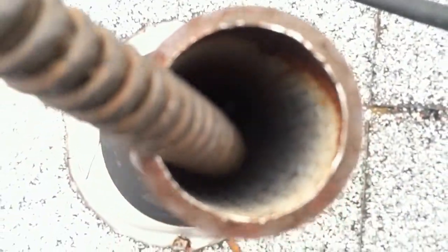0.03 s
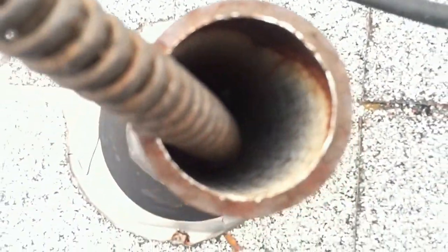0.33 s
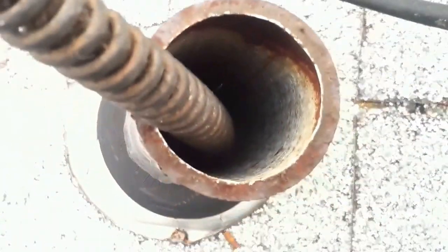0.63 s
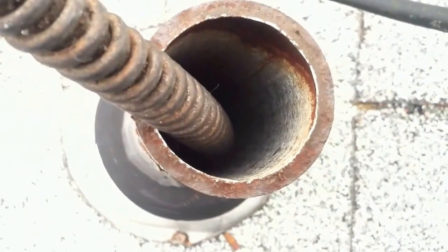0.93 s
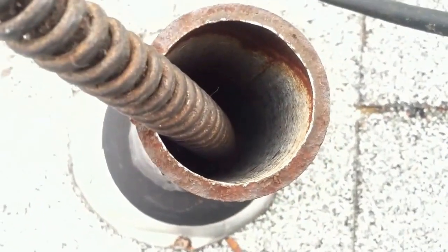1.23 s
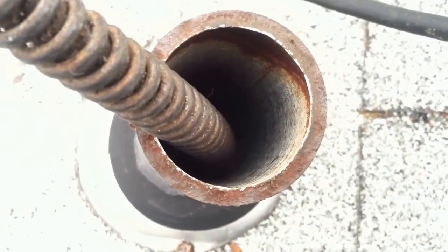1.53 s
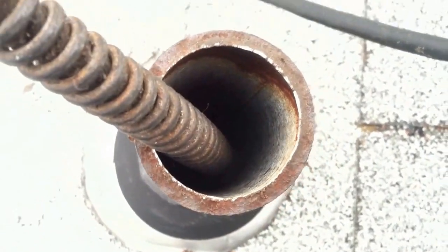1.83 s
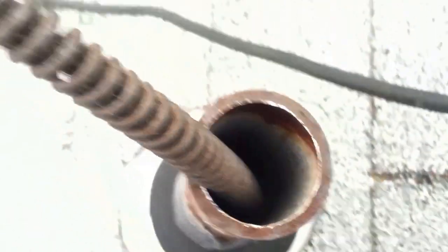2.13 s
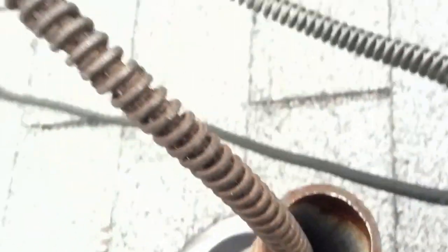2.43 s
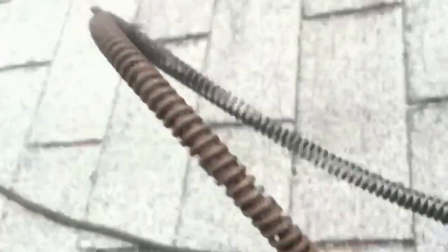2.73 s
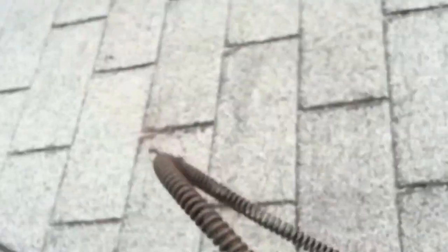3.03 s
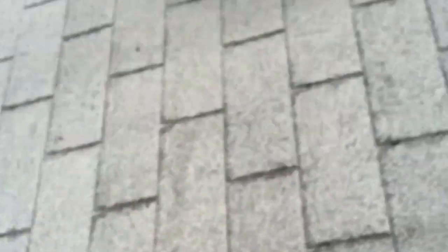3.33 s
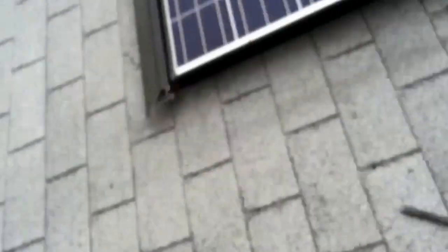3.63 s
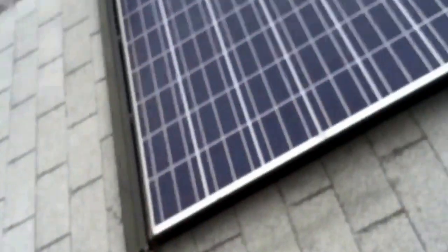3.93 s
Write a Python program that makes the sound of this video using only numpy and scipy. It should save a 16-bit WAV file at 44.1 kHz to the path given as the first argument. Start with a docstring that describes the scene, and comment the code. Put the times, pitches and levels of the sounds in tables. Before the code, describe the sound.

Water splashing and plopping inside a roof vent pipe, giving way to dull microphone bumps.

```python
"""Water rushes and splashes down a drain, heard at the mouth of a roof vent pipe with a drain cable in it.
Ringing bubbles make the gurgles and plops, and hard drops set the pipe ringing.
After two seconds the microphone draws away: the water fades, wind and handling thump on the microphone,
grit ticks and scuffs on the shingles, and a high outdoor hiss is left."""
import sys
import numpy as np
from scipy import signal
from scipy.fft import rfft, irfft, next_fast_len
from scipy.io import wavfile

SR = 44100
rng = np.random.default_rng(int(sys.argv[2]) if len(sys.argv) > 2 else 0)


def to_wav(sig):
    """Store sig (one row per channel, or 1-D mono) as 16-bit WAV at the path in sys.argv[1].

    Samples outside -1..1 are clipped; the rate is SR.
    """
    pcm = np.clip(np.atleast_2d(sig), -1, 1) * 32767
    pcm = np.round(pcm).astype(np.int16)
    wavfile.write(sys.argv[1], SR, pcm.T)  # frames by channels


N = 176400

# How loud the water is. Each row: time in seconds, level in dB.
WATER_LEVEL = [(0, -42.5), (.3, -43), (.55, -41.5), (.6, -46), (.67, -43.5), (.75, -41.5), (.81, -46),
               (.88, -44), (1.04, -44), (1.27, -44), (1.45, -44), (1.72, -46), (1.81, -44), (1.89, -46.5),
               (2.02, -43.5), (2.16, -52), (2.35, -50.5), (2.6, -54), (3.1, -58.5), (3.35, -64), (4, -92)]
# The water's tone at the pipe mouth. Each row: frequency in Hz, relative level in dB.
MOUTH_TONE = [(60, -31), (140, 0), (300, -1), (460, -9), (530, -6), (780, -5), (1080, -8.5), (1400, -2.5),
              (1620, -5.5), (1850, 0.5), (2300, -1), (2520, -7), (2750, -3.5), (2950, -23.5), (3100, -14),
              (3450, -5), (3800, -3), (4080, -9.5), (4500, -6.5), (5200, -11), (6000, -26.5), (7000, -39),
              (12000, -49)]
# Its tone from beside the pipe. Each row: frequency in Hz, relative level in dB.
BESIDE_TONE = [(60, -9.5), (200, 4.5), (550, -6), (760, 1.5), (1130, -2.5), (1370, 1.5), (1680, -1.5),
               (2100, 1), (2550, -1.5), (3000, -6), (3500, -4), (4600, -5.5), (6000, -8), (8000, -23),
               (12000, -61)]
# The water's splashy treble. Each row: time in seconds, boost or cut in dB.
TREBLE_LEVEL = [(0, -9), (.45, -6.5), (.62, -7.5), (.74, -5), (.82, -7), (1.1, -4), (1.22, -4), (1.3, -2),
                (1.6, -4.5), (1.8, 2), (1.9, -5.5), (2.02, -4.5), (2.35, -2), (2.7, -3), (4, 10.5)]
# Echoes in the pipe. Each row: delay in seconds, gain.
PIPE_ECHOES = [(.0031, 0.053), (0.0159, -0.068), (.021, -0.031)]
# Big drops. Each row: start in seconds, level in dB, pitch in Hz, seconds to fade by 60 dB.
PLOPS = [(.052, -46, 2140, 0.024), (.2269, -29.5, 2260, 0.017), (0.2487, -35, 1900, 0.022),
         (.3092, -34, 2060, .02), (.3326, -34, 1816, 0.03), (0.361, -34, 1940, 0.017),
         (.4604, -43, 2170, 0.023), (.6807, -23, 2320, 0.018), (.6872, -41, 2270, 0.017),
         (.7302, -26, 2010, 0.017), (.862, -34, 2100, 0.017), (0.957, -32, 2315, 0.018),
         (1.115, -38, 1930, .02), (1.246, -25.5, 1850, 0.0096), (1.342, -36.5, 2210, 0.034),
         (1.772, -36, 2060, 0.025), (1.78, -36, 2000, .02), (1.792, -36, 2170, 0.015),
         (1.811, -31, 2023, .02), (1.831, -29.5, 2390, 0.016), (1.936, -35, 1870, 0.023),
         (2.003, -36.5, 2040, .03), (2.3136, -34, 2470, .02)]
# Low gurgles. Each row: start in seconds, level in dB, pitch in Hz.
GULPS = [(1.094, -38, 490), (1.116, -43, 366), (1.133, -40.5, 576)]
# Hard drops. Each row: start in seconds, level in dB, pitch in Hz.
SMACKS = [(.466, -31, 3870), (.477, -31.5, 3490), (.668, -35, 4180), (.681, -39, 3440), (0.72, -31, 3570),
          (.7315, -33, 3670), (.917, -33, 3720), (1.208, -33, 3650), (1.215, -37.5, 4850),
          (1.226, -43, 4600), (1.513, -35, 4500), (1.515, -28, 3530), (1.627, -36, 4470),
          (1.696, -35, 3680), (1.742, -40, 3570), (1.81, -30.5, 4210), (1.832, -41, 3496),
          (1.985, -36.5, 5120)]
# Brief gushes. Each row: middle in seconds, level in dB.
SLOSHES = [(.1, -46), (0.147, -46.5), (.33, -44), (0.381, -45), (0.446, -54), (.51, -56), (.672, -45.5),
           (0.752, -43), (0.949, -45), (1.12, -53), (1.252, -45.5), (1.368, -45.5), (1.51, -50),
           (2.005, -47)]
# A bright band of splashing. Each row: time in seconds, centre in Hz, level in dB.
BRIGHT_BAND = [(0, 3726, -52), (0.702, 3810, -58), (1.0, 4020, -56.5), (1.25, 4487, -62), (1.9, 4400, -58),
               (2.15, 4396, -58.5), (2.4, 5000, -59.5), (2.599, 5530, -59), (2.85, 5550, -78),
               (3.1, 5540, -93)]
# How loud the fine spray is. Each row: time in seconds, level in dB.
SPRAY_LEVEL = [(0, -63.5), (.1, -61), (.5, -62), (.53, -52.5), (.56, -66), (.62, -66), (.75, -58.5),
               (.85, -74), (.92, -63.5), (1.03, -70), (1.07, -59.5), (1.12, -68), (1.5, -63), (1.67, -66.5),
               (1.71, -55), (1.74, -63.5), (1.81, -59), (1.88, -69), (2.02, -65), (2.055, -62.5),
               (2.11, -73.5), (2.8, -72)]
# The spray's tone. Each row: frequency in Hz, relative level in dB.
SPRAY_TONE = [(4500, -34), (6000, -3), (6900, -1), (7900, 1), (8800, -6.5), (9400, -9.5), (10100, -37),
              (10600, -16.5), (11400, -13), (12300, -51), (15000, -59)]
# The pipe's two ringing notes, and a whistle. Each row: time in seconds, level in dB.
LOW_RING_LEVEL = [(0, -63), (2.2, -67), (2.7, -77), (3.12, -57), (3.4, -80), (3.6, -73), (4, -74)]
HIGH_RING_LEVEL = [(1.3, -73), (1.6, -60.5), (2.3, -67.5), (2.55, -66), (2.9, -73)]
WHISTLE_LEVEL = [(2.1, -100), (2.15, -73), (2.25, -73), (2.33, -78), (2.45, -100)]
# Thumps on the microphone. Each row: start in seconds, level in dB, pitch in Hz.
THUMPS = [(2.096, -45, 167), (2.119, -35, 147.6), (2.202, -27.5, 171.5), (2.213, -31, 187.4),
          (2.241, -27.5, 185), (2.279, -43.5, 186), (2.386, -31, 161.5), (2.438, -33.5, 157),
          (2.502, -35, 175), (2.568, -28, 173), (2.577, -28, 174), (2.59, -32, 197), (2.609, -28, 167),
          (2.631, -29, 214), (2.705, -36, 169), (2.718, -31.5, 192), (2.733, -33, 147), (2.824, -32.5, 225),
          (2.841, -27.5, 260), (2.877, -26, 195), (2.92, -31, 189), (2.944, -31.5, 186), (2.961, -27, 178),
          (3.099, -43, 180), (3.31, -30, 282), (3.32, -39, 223), (3.329, -39, 180), (3.526, -37, 113)]
# Grit ticks. Each row: start in seconds, level in dB, pitch in Hz.
TICKS = [(2.425, -39, 5255), (2.5247, -31.5, 5090), (2.9058, -34, 5200), (2.9547, -33, 5400),
         (3.1512, -46.5, 4160), (3.249, -42.5, 5060), (3.3228, -32.5, 5360), (3.4097, -37.5, 5140),
         (3.558, -38.5, 5330), (3.6067, -45, 4830)]
# Gritty scuffs. Each row: middle in seconds, half length in seconds, level in dB.
SCUFFS = [(3.06, 0.046, -56), (3.103, 0.013, -51.5), (3.612, 0.012, -58.5)]
# The tones of scuffs, wind and outdoor air. Each row: frequency in Hz, relative level in dB.
SCUFF_TONE = [(500, -37), (2200, -5), (3000, -3), (4200, 7.5), (5300, 13), (6500, -10), (9000, -18),
              (15000, -40)]
WIND_TONE = [(25, -63.5), (50, -40), (85, -4.5), (135, 8.5), (210, 5.5), (380, -10), (600, -33.5),
             (1500, -57.5)]
AIR_TONE = [(24, -39), (45, -16), (90, -9.5), (150, -1.5), (300, 0), (470, -4), (800, -8.5), (1300, -11),
            (1850, -17), (2300, -14.5), (3000, -16), (4200, -13), (5250, -6.5), (6000, -13), (7200, -21),
            (9200, -30), (12000, -39), (15500, -57)]
# How loud the wind and the air are. Each row: time in seconds, level in dB.
WIND_LEVEL = [(0, -59), (2.0, -58.5), (2.15, -52.5), (2.33, -54), (2.47, -53.5), (2.58, -43.5),
              (2.66, -47.5), (2.73, -43), (2.79, -47), (2.96, -45.5), (3.0, -57), (3.25, -61.5),
              (3.58, -57.5), (3.68, -63), (4, -69)]
AIR_LEVEL = [(0, -57.5), (2.2, -58), (2.6, -57.5), (3.1, -57.5), (3.5, -58.5), (3.8, -54.5), (4, -56.5)]

TIME = np.arange(N) / SR
MOVE_ASIDE_S = 2.13
PLOP_RISE_PER_S = 11.6  # pitch climb, in starting pitches per second


def from_db(db):
    """Turn decibels into a gain."""
    return 10 ** (np.asarray(db) / 20)


def rms_one(x):
    """Scale a sound to an average power of 1."""
    return x / np.sqrt(np.mean(x ** 2) + 1e-20)


def level(rows):
    """A gain for every sample, from rows of seconds and dB."""
    return from_db(np.interp(TIME, *np.transpose(rows)))


def fade(t, seconds):
    """Die away by 60 dB in the given time."""
    return np.exp(-np.log(1000) * t / seconds)


def colour(x, tone):
    """Filter a sound to follow rows of Hz and dB; white noise keeps its power."""
    size = next_fast_len(N + SR // 4)
    size += size % 2
    hz, db = np.transpose(tone)
    bins_hz = np.arange(size // 2 + 1) * SR / size
    gain = from_db(np.interp(np.log(bins_hz + 1), np.log(hz), db))
    # Fold the filter so that it rings only after a sound, never before.
    cepstrum = irfft(np.log(rms_one(gain)))
    cepstrum[1:size // 2] *= 2
    cepstrum[size // 2 + 1:] = 0
    return irfft(rfft(x, size) * np.exp(rfft(cepstrum)))[:N]


def drift(hz):
    """A smooth random wander, about 1 in size."""
    pole = np.exp(-2 * np.pi * hz / SR)
    return rms_one(signal.lfilter([1], [1, -2 * pole, pole * pole], rng.standard_normal(N + SR))[SR:])


def add(track, s, sound):
    """Mix a sound into a track, starting at s seconds."""
    i = int(s * SR)
    track[i:i + len(sound)] += sound[:N - i]


def band_pass(x, low_hz, high_hz):
    """Keep what lies between two frequencies."""
    return signal.sosfilt(signal.butter(2, [low_hz, high_hz], "band", fs=SR, output="sos"), x + 1e-18)


def ringing_noise(hz, width_hz):
    """Noise gathered around one pitch."""
    return rms_one(band_pass(rng.standard_normal(N), hz - width_hz / 2, hz + width_hz / 2))


def water():
    """Bubbles and a smooth rush come up the pipe; the tone switches when the microphone moves aside."""
    bubbles = bubbling(low_hz=458.6, high_hz=7270, per_s=1600, cycles=26.2, spread_db=3)
    flow = pipe(bubbles + from_db(0.5) * rng.standard_normal(N))
    at_mouth = rms_one(colour(flow, MOUTH_TONE))
    beside = rms_one(colour(flow, BESIDE_TONE))
    heard = np.where(TIME > MOVE_ASIDE_S, beside, at_mouth)
    treble = signal.sosfiltfilt(signal.butter(4, 3100, "high", fs=SR, output="sos"), heard)
    heard += (level(TREBLE_LEVEL) - 1) * treble
    return from_db(-0.2) * level(WATER_LEVEL) * heard


def bubbling(low_hz, high_hz, per_s, cycles, spread_db):
    """Random bubbles each ring briefly at their own pitch; high ones die sooner."""
    out, t = np.zeros(N), TIME[:SR // 20]
    for when, pitch, size, flip in rng.random((int(per_s * N / SR), 4)):
        hz = low_hz * (high_hz / low_hz) ** pitch
        ring_s = cycles / hz
        age = t[:int(ring_s * SR) + 2]
        size_db = spread_db * min(-np.log(size), 3.2)
        gain = hz * from_db(size_db) * np.sign(flip - .5)  # hz keeps highs as strong as lows
        add(out, when * (N - 1) / SR, gain * np.sin(2 * np.pi * hz * age) * fade(age, ring_s))
    return rms_one(out)


def pipe(x):
    """Joints and bends send back short echoes, and the pipe adds a hollow ring."""
    t = TIME[:SR // 5]
    tail = rng.standard_normal(len(t)) * fade(t, seconds=0.12)
    ring = from_db(-10.5) * signal.fftconvolve(x, tail / np.linalg.norm(tail))[:N]
    echoes = sum(gain * np.pad(x, (int(s * SR), 0))[:N] for s, gain in PIPE_ECHOES)
    return x + ring + echoes


def plops():
    """Big drops and gulps are bubbles that ring with rising pitch; the drops also splash."""
    t, gulp_ring_s = TIME[:SR // 12], 0.032
    rings, splashes = np.zeros(N), np.zeros(N)
    attack = 1 - np.exp(-t / 0.00053)
    for s, db, hz, ring_s in PLOPS + [(*gulp, gulp_ring_s) for gulp in GULPS]:
        ring = np.sin(2 * np.pi * hz * (t + PLOP_RISE_PER_S * t * t / 2))
        add(rings, s, from_db(db + 3) * ring * attack * fade(t, ring_s))
    for s, db, _, _ in PLOPS:
        add(splashes, s, from_db(db - 14.5) * rng.standard_normal(len(t)) * fade(t, seconds=0.03))
    return pipe(rings + colour(splashes, MOUTH_TONE))


def smacks():
    """Hard drops spatter and set the pipe's high notes ringing for an instant."""
    t, out = TIME[:SR // 12], np.zeros(N)
    attack = 1 - np.exp(-(t / 0.00097) ** 2)
    envelope = attack * fade(t, seconds=0.029)
    for s, db, hz in SMACKS:
        spatter = from_db(-4) * ringing_noise(hz, width_hz=1180)[-len(t):]
        add(out, s, from_db(db - 3.5) * envelope * (np.sin(2 * np.pi * hz * t) + spatter))
    return out


def sloshes():
    """Gushes of water swell and pass with a broad, low rasp."""
    half_length_s = 0.0097
    swell = sum(from_db(db) * np.exp(-((TIME - s) / half_length_s) ** 2) for s, db in SLOSHES)
    return swell * ringing_noise(hz=1360, width_hz=1130)


def bright_splashing():
    """A flickering band of splash noise climbs in pitch as the microphone moves."""
    s, hz, db = np.transpose(BRIGHT_BAND)
    width_hz, flicker_db = 740, 4
    phase = 2 * np.pi * np.cumsum(np.interp(TIME, s, hz)) / SR
    low_pass = signal.butter(3, width_hz / 2, fs=SR, output="sos")
    noise = signal.sosfilt(low_pass, rng.standard_normal((2, N)))
    band = noise[0] * np.cos(phase) + noise[1] * np.sin(phase)  # lifts the noise to the moving pitch
    flicker = from_db(flicker_db * drift(hz=53))
    return level(np.column_stack([s, db])) * rms_one(band * flicker)


def spray():
    """Tiny droplets fizz; the sound beams straight out of the pipe and is lost off to the side."""
    droplets = bubbling(low_hz=5890, high_hz=11670, per_s=2000, cycles=90, spread_db=3.9)
    fizz = pipe(droplets + from_db(-6) * rng.standard_normal(N))
    in_beam = np.interp(TIME, [2.4, 2.95], [1, 0])
    return from_db(-2) * level(SPRAY_LEVEL) * in_beam * rms_one(colour(fizz, SPRAY_TONE))


def pipe_notes():
    """Sound bouncing across the pipe's width rings at two thin notes."""
    low = level(LOW_RING_LEVEL) * ringing_noise(hz=2098, width_hz=230)
    high = level(HIGH_RING_LEVEL) * ringing_noise(hz=3510, width_hz=80)
    return low + high


def buffeting():
    """Wind and handling thump dully on the microphone, over an uneven wind rumble."""
    t, thumps = TIME[:SR // 8], np.zeros(N)
    for s, db, hz in THUMPS:
        add(thumps, s, from_db(db - 2) * 2 * np.sin(2 * np.pi * hz * t) * fade(t, seconds=0.025))
    rumble = colour(rng.standard_normal(N), WIND_TONE) * from_db(1.5 * drift(hz=25))
    return band_pass(thumps, 120, 494.6) + level(WIND_LEVEL) * rms_one(rumble)


def grit():
    """Grains snap with a very short ring, and scuffs crunch on the shingles."""
    t, snaps = TIME[:SR // 16], np.zeros(N)
    for s, db, hz in TICKS:
        ring = np.sin(2 * np.pi * hz * t)
        crack = from_db(-1) * rng.standard_normal(len(t))
        add(snaps, s, from_db(db - 1.5) * (ring + crack) * fade(t, seconds=0.0088))
    crunch = rms_one(rng.standard_normal(N) * from_db(2.3 * drift(hz=150)))
    scuffs = sum(from_db(db) * np.exp(-((TIME - s) / half) ** 2) for s, half, db in SCUFFS)
    return band_pass(snaps, 3200, 5700) + colour(scuffs * crunch, SCUFF_TONE)


def whistle():
    """A faint, high whistle comes and goes."""
    return level(WHISTLE_LEVEL) * ringing_noise(hz=7140, width_hz=54)


def air():
    """Distant outdoor rumble with a high hiss."""
    return level(AIR_LEVEL) * rms_one(colour(rng.standard_normal(N), AIR_TONE))


def scene():
    """All the sounds meet at one microphone."""
    drain = water() + plops() + smacks() + sloshes() + bright_splashing() + spray() + pipe_notes()
    return (drain + buffeting() + grit() + whistle() + air())[None]


def record(dry):
    """Cut the treble above 15200 Hz."""
    return signal.sosfilt(signal.ellip(10, .1, 70, 15200, fs=SR, output="sos"), dry)


dry = scene()
out = record(dry)
to_wav(out)
```